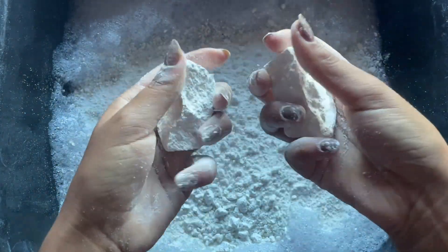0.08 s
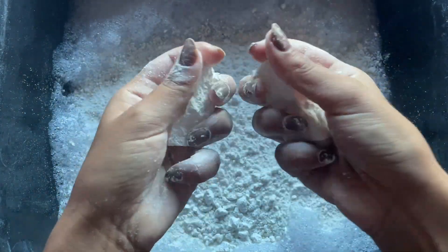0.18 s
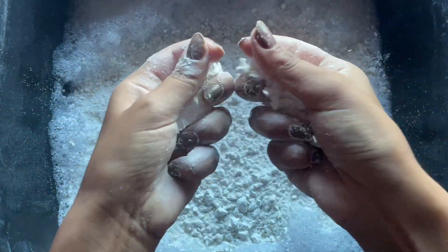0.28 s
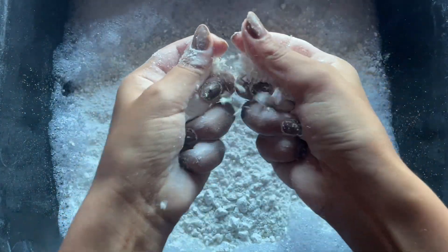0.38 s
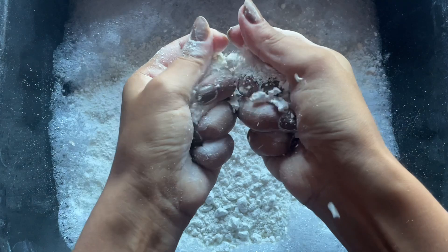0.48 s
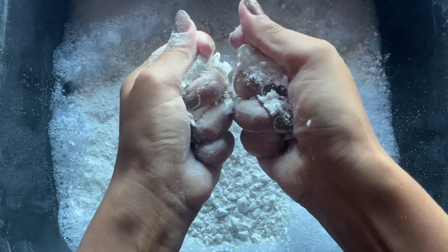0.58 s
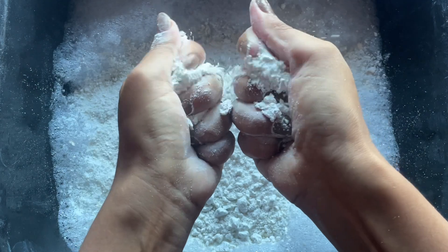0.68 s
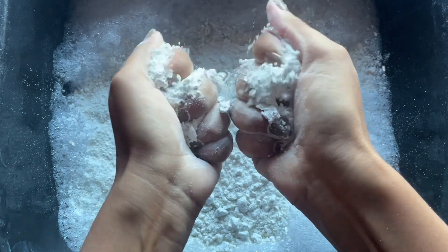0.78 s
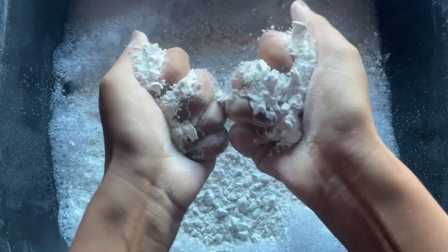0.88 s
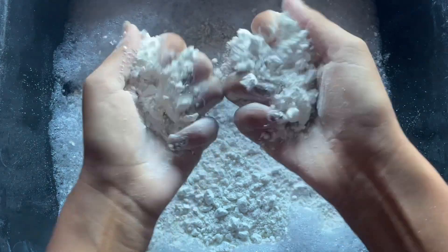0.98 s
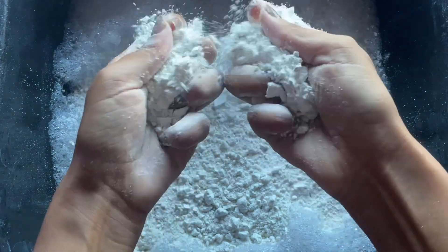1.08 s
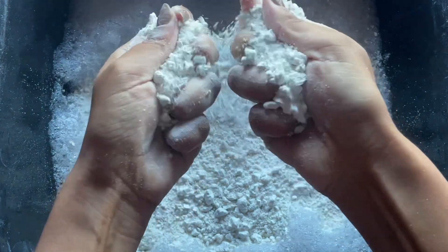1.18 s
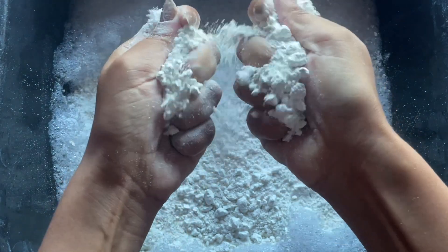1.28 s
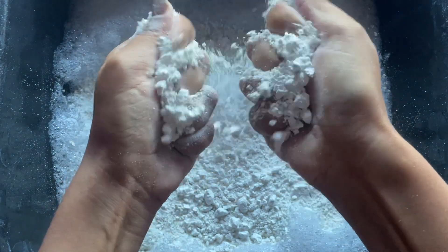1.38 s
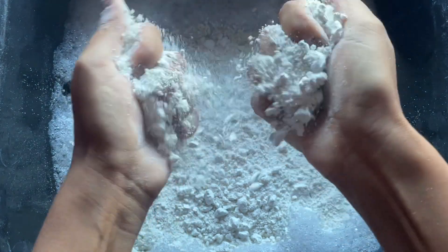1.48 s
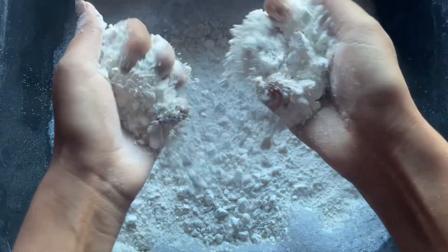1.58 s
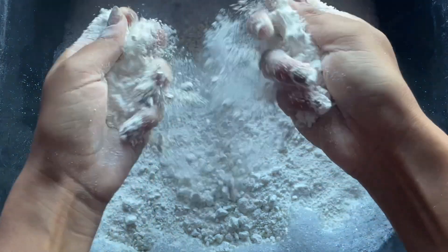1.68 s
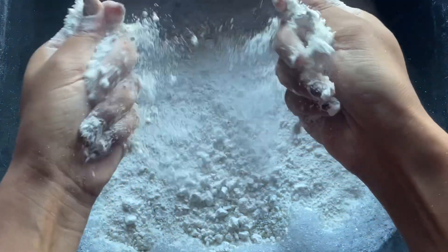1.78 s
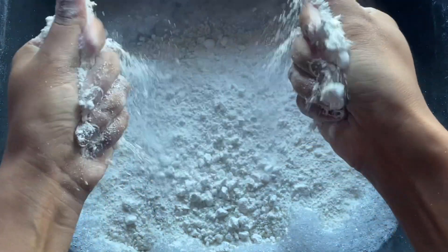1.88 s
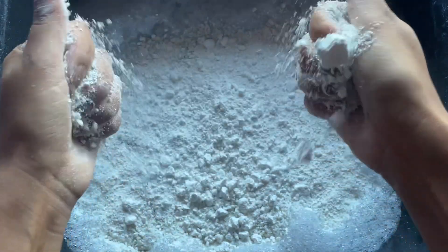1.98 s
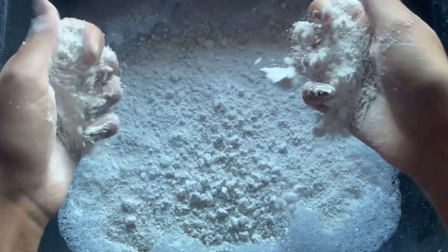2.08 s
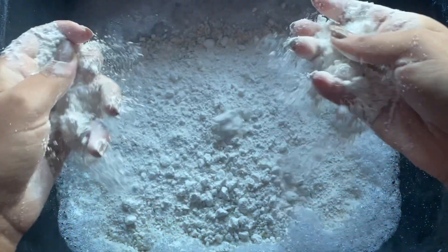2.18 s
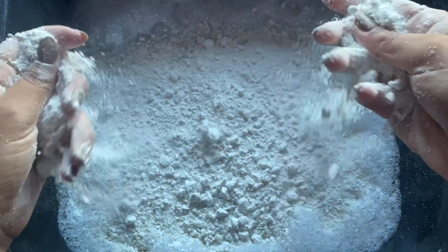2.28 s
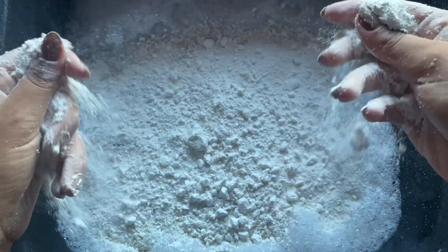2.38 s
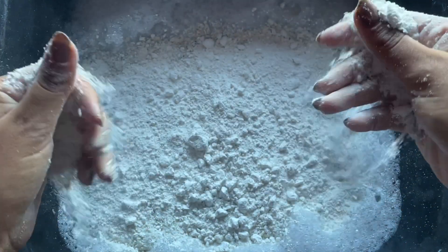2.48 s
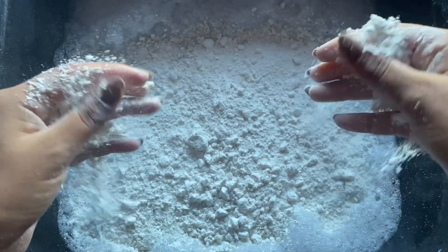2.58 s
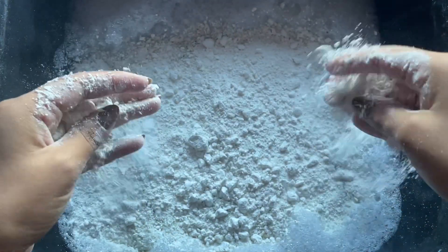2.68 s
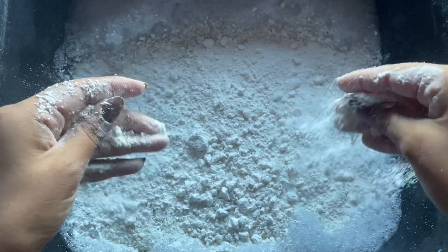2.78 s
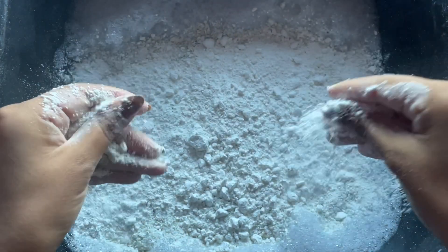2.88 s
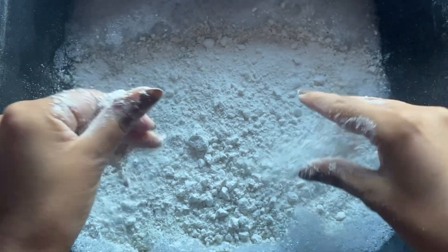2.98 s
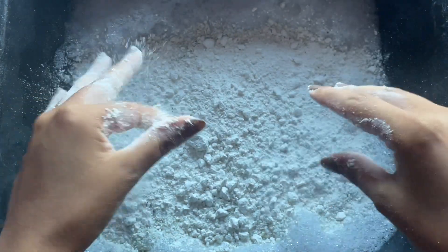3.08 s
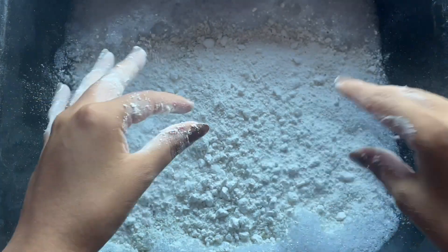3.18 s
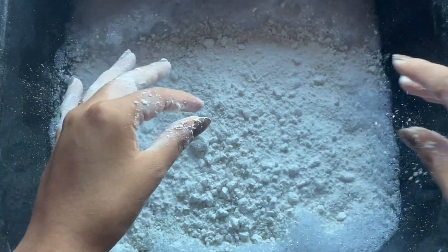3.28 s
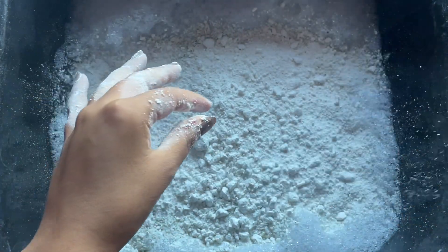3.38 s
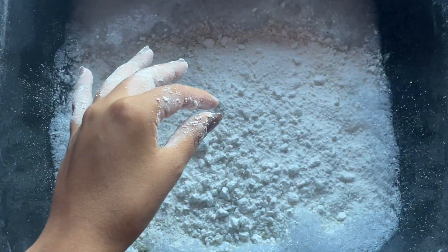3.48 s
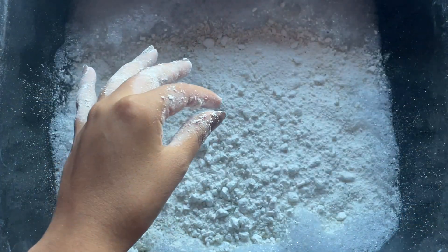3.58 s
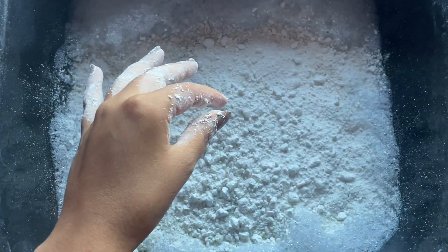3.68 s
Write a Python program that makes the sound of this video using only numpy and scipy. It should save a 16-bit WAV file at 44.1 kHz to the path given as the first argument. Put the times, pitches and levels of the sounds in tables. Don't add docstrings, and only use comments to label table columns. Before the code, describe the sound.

Dry snapping and crunching of powder clumps, then falling grains patter over soft low bumps.

```python
import sys
import numpy as np
from scipy import signal
from scipy.fft import rfft, irfft, next_fast_len
from scipy.io import wavfile
from scipy.ndimage import uniform_filter1d

SR = 44100
rng = np.random.default_rng(int(sys.argv[2]) if len(sys.argv) > 2 else 0)


def amplitude_ratio(level_db):
    exponent = np.asarray(level_db, float) / 20
    return 10 ** exponent


def put_to_file(sound):
    columns = np.atleast_2d(sound).T
    safe = np.clip(columns, -1, 1)
    whole_steps = np.round(safe * 32767)
    wavfile.write(sys.argv[1], SR, whole_steps.astype(np.int16))


N = 165375

# time in seconds, patter level in dB,
# tub drumming in dB relative to the patter, fine dust in dB relative to the patter.
POWDER_FLOW = [(0, -58.5, -11, -26), (.065, -58, -11, -19), (.11, -58, -11, -28), (.19, -58, -10, -28),
               (.3, -51.5, -4, -28), (.55, -54, -8, -28), (.95, -56, -8, -28), (1.19, -51.5, -3, -29),
               (1.36, -56, -3, -27), (1.45, -54.5, -4, -27), (1.6, -54.5, -5, -28), (1.8, -47.5, -7.5, -27),
               (1.97, -45.5, -8.5, -26.5), (2.03, -51, -7, -26), (2.19, -51.5, -10, -27),
               (2.26, -45.5, -5, -25), (2.39, -44, -8, -23), (2.53, -43, -9, -23.5), (2.59, -48, -9, -26),
               (2.66, -49, -7, -27), (2.78, -46.5, -12, -27), (2.9, -47, -15, -28), (3.02, -51, -10, -28),
               (3.21, -48, -9.5, -27.5), (3.33, -51.5, -11, -26.5), (3.47, -52, -17, -25.5),
               (3.54, -56, -12, -25), (3.69, -54, -17, -26), (3.75, -55, -12, -26)]
# start in seconds, peak in dB, tub ring in dB relative to the crack,
# centre of the crack in Hz.
CLUMP_CRACKS = [(0.0655, -40, -27, 3200), (0.1171, -43.5, -25, 2070), (0.1555, -43, -26, 1820),
                (0.2079, -20.5, -12.5, 990), (0.2206, -29, -12.5, 1910), (0.2343, -19.5, -13.5, 1600),
                (0.2582, -37, -9.5, 1310), (0.2795, -24.5, -16, 2530), (0.2965, -30, -12, 2370),
                (0.3157, -31.5, -18, 1420), (0.3214, -30, -15, 3020), (0.3979, -31, -30, 2500),
                (0.4151, -35, -23, 2330), (0.4876, -41, -29, 2010), (0.5448, -30, -12, 1000),
                (0.5842, -42, -4.5, 2650), (0.6805, -38.5, -10.5, 1380), (0.7269, -40.5, -12.5, 1970),
                (0.7752, -40.5, -20, 2240), (0.7993, -42, -23, 1740), (0.8325, -39, -23, 2020),
                (0.8984, -38, -27, 2220), (1.066, -42, -20, 2610), (1.0752, -36, -16.5, 2220),
                (1.1719, -33, -12, 902), (1.1818, -38, -12, 1810), (1.2094, -37, -20, 1600),
                (1.2571, -37.5, -10, 2820), (1.5195, -36, -13, 1590), (1.3866, -41, -16, 1800),
                (1.5972, -39, -16, 2020), (1.6605, -36, -20, 2720), (2.1943, -34, -17, 2530),
                (2.2387, -35, -19, 2300), (2.2706, -32, -22, 2090), (2.2929, -32, -24, 2140),
                (2.7041, -35, -22, 2300), (2.75, -34, -26, 2450), (3.1656, -35, -22, 2010),
                (3.3327, -34, -27, 1880), (3.3881, -36, -30, 2330), (3.435, -37, -30, 4200),
                (3.5278, -39, -27, 2220), (3.5602, -39, -27, 2100), (3.6525, -40, -30, 2480),
                (3.6724, -34, -36, 2500), (3.6974, -38, -30, 3500)]
# middle in seconds, peak in dB, pitch in Hz, length in seconds.
STAND_BUMPS = [(0.305, -41.5, 70.4, 0.038), (0.367, -49, 80, 0.032), (0.439, -47, 50, .03),
               (0.626, -40, 64, 0.037), (.9, -50, 60, .02), (0.968, -49, 70, .025), (1.031, -36, 62, .022),
               (1.047, -35, 60, .022), (1.148, -41, 55, 0.027), (1.196, -34, 54.7, .03),
               (1.238, -41, 60, .03), (1.321, -44.5, 65, 0.027), (1.363, -42, 54.7, .025),
               (1.541, -42.5, 63, 0.03), (1.729, -47, 75, .03), (1.856, -39.5, 54.7, .04),
               (1.998, -41, 60, 0.05), (2.099, -48, 55, 0.027), (2.191, -49, 55, .03), (2.46, -46, 60, .03),
               (2.56, -46, 55, .03), (2.753, -41.5, 69, 0.035), (3.152, -44, 65, .025),
               (3.203, -29.5, 62.4, 0.029), (3.247, -39.5, 55, .025), (3.304, -33.5, 52, 0.028),
               (3.373, -34.5, 52, 0.025), (3.438, -44.5, 68, 0.041)]
# middle in seconds, peak in dB, pitch in Hz, length in seconds.
LUMP_THUDS = [(.26, -46, 330, .03), (.3, -46, 150, .06), (.586, -48, 380, .012), (.635, -52, 350, .03),
              (.69, -52, 300, .02), (1.27, -51, 520, .025), (1.42, -54, 410, .025), (1.64, -52, 395, .05),
              (1.9, -52, 400, .07), (2.53, -50, 570, .03), (2.6, -52, 140, .05), (2.71, -54, 430, .03),
              (2.84, -51, 435, .03), (2.99, -54, 550, .04), (3.06, -52, 575, .025), (3.16, -51, 440, .018),
              (3.26, -52, 140, .06)]
# pitch in Hz, level in dB, time to fade by 60 dB in seconds.
TUB_NOTES = [(390.4, -1, 0.044), (300, -7, 0.055), (540, -4.5, 0.033), (740, 1, .016), (1000, 1.5, .012)]

# frequency in Hz, level in dB.
GRAIN_TONE = [(300, -18.5), (800, -8), (1500, -3.5), (2300, -1.5), (3600, -5.5), (5500, -12.5), (7500, -23),
              (11000, -68)]
# frequency in Hz, level in dB.
DUST_TONE = [(3000, -43), (6500, 2), (8500, 15), (10500, -.5), (12000, -18), (13200, -21), (14500, -45)]
# frequency in Hz, level in dB.
DRUM_TONE = [(120, -13), (220, -8), (300, -2), (400, 0), (560, -2), (800, -8), (1500, -30)]
# frequency in Hz, level in dB.
HOLLOW_TONE = [(900, -26), (1600, -11), (1840, -4), (2000, -8), (2230, 1), (2520, -6), (2750, -1),
               (3700, -14), (7000, -40)]
# frequency in Hz, level in dB.
ROOM_TONE = [(60, -2), (300, -1), (600, 0), (1400, -2), (1780, 4.5), (2100, -0.5), (3400, -10), (5000, -30)]
# frequency in Hz, level in dB per Hz.
RUMBLE_TONE = [(20, -25), (35, -11), (55, -3.5), (72, -2.5), (95, -10), (150, -12.5), (250, -23.5),
               (500, -65.5)]
# frequency in Hz, level in dB.
WALL_TONE = [(200, -1), (2000, -2), (3500, -15), (7000, -43)]
# frequency in Hz, lead in radians.
LEFT_LEAD = [(20, 0), (4200, 0), (5200, -.2), (6200, -.5), (6900, -.9), (7600, -2.1), (8250, -np.pi),
             (9000, -4.1), (10000, -5.2), (10900, -2 * np.pi), (12200, -2 * np.pi), (13500, -7.5)]
# frequency in Hz, level in dB.
LEFT_EXTRA = [(250, -.7), (1000, .2), (2200, 1.7), (5000, .6), (7000, 0)]
# frequency in Hz, level in dB.
MIC_TREBLE = [(9000, 0), (11500, -3), (12300, -5), (13000, -11), (13600, -20), (14500, -28)]


def read(table, hz):
    table = np.array(table, float)
    return np.interp(np.log(hz + 1), np.log(table[:, 0] + 1), table[:, 1])


def colour(x, table):
    size = next_fast_len(N + 8192)
    log_gain = read(table, np.fft.rfftfreq(8192, 1 / SR)) * np.log(10) / 20
    ceps = irfft(log_gain)
    ceps[1:4096] *= 2
    ceps[4097:] = 0
    response = irfft(np.exp(rfft(ceps)))
    y = irfft(rfft(x, size) * rfft(response, size), size)[:N]
    return y / np.sqrt(np.mean(y ** 2))


def walk(rate):
    hold = int(SR / rate)
    steps = np.repeat(rng.standard_normal(N // hold + 1), hold)
    return 1.35 * uniform_filter1d(uniform_filter1d(steps, hold), hold)[:N]


def ticks(per_s, spread_db):
    draw = rng.random(N) * SR / per_s
    size = amplitude_ratio(-spread_db * np.log(np.minimum(draw, 1) + .02))
    x = np.where(draw < 1, size, 0.)
    x = x * np.sign(np.sin(draw * 999))
    return x / x.std()


def specks(per_s, spread_db, hiss):
    hiss = np.clip(hiss, 0, 1)
    return np.sqrt(1 - hiss) * ticks(per_s, spread_db) + np.sqrt(hiss) * rng.standard_normal(N)


def powder(t):
    rows = np.array(POWDER_FLOW).T
    level, tub_db, dust_db = (np.interp(t, rows[0], r) for r in rows[1:])
    flurry = amplitude_ratio(level + 1.2 + .3 * walk(16) + 1.1 * walk(110))

    fall = specks(per_s=3000, spread_db=3.5, hiss=.49)
    dust = amplitude_ratio(dust_db + .6 * walk(25)) * colour(fall, DUST_TONE)
    grains = colour(fall, GRAIN_TONE) + dust

    hollow_db = -5.5 + .6 * (level + 45)
    hollow = amplitude_ratio(hollow_db) * colour(specks(900, 3., .3), HOLLOW_TONE)
    drum = amplitude_ratio(tub_db + 1.8 * walk(22)) * colour(specks(700, 2.7, .52), DRUM_TONE)
    room = amplitude_ratio(-9.5 + .7 * walk(10)) * colour(specks(2000, 2.4, .62), ROOM_TONE)
    mic_hiss = amplitude_ratio(-84) * colour(rng.standard_normal(N), DUST_TONE)
    return flurry * (grains + hollow + drum) + mic_hiss, flurry * room


def rumble():
    return amplitude_ratio(-57 + 2.8 * walk(14)) * colour(rng.standard_normal(N), RUMBLE_TONE)


def tub_ring(t):
    ring = 0
    for db, hz, t60 in ((db, hz, t60) for hz, db, t60 in TUB_NOTES):
        onset = 1 - np.exp(-t / .0004)
        ring = ring + amplitude_ratio(db) * np.sin(2 * np.pi * hz * t) * onset * 1000 ** (-t / t60)
    return np.roll(ring * (t < .09), 70)


def cracks():
    size = 4096
    out, t = np.zeros(N + size), np.arange(size) / SR
    ring = tub_ring(t)
    f = np.fft.rfftfreq(size, 1 / SR)
    grain_tone = amplitude_ratio(np.maximum(read(GRAIN_TONE, f), -48) * .72)
    bright_peak = .6 / (1 + ((f - 3800) / 500.) ** 2)
    for s, db, tub_db, hz in CLUMP_CRACKS:
        softness = np.abs(db + 21)
        width = .0006 + .0001 * softness
        crumbs = amplitude_ratio(-12) * (1 - np.exp(-t / width)) * np.exp(-t / .009)
        snap = np.exp(-(t / width - 1.2) ** 2) + crumbs
        clump_peak = 1 / (1 + ((f - hz) / 500.) ** 2)
        tone = grain_tone * (.4 + clump_peak + bright_peak)
        burst = snap * irfft(rfft(rng.standard_normal(size)) * tone)
        burst = burst / np.abs(burst).max()
        level = amplitude_ratio(db + .6 - .25 * softness)
        i = int(s * SR)
        out[i:i + size] += level * (burst + amplitude_ratio(tub_db + 6) * ring)
    return out[:N]


def thuds(t):
    out, rise_per_s, wobble_depth = 0, .6, .11
    wobble = np.cumsum(walk(130)) / SR
    waver = amplitude_ratio(-3 + 3.5 * walk(90))
    for s, db, hz, length in LUMP_THUDS:
        u = np.clip(t - s, -.25, .25)
        swell = np.exp(-(u / length) ** 2)
        turns = hz * (u + rise_per_s * u ** 2 / 2 + wobble_depth * wobble)
        out = out + amplitude_ratio(db) * swell * np.sin(2 * np.pi * turns)
    return out * waver


def bumps(t):
    out, sag_per_s = 0, 12
    for s, db, hz, length in STAND_BUMPS:
        u = np.clip(t - s, -.1, .1)
        swell = np.exp(-(u / (length * np.where(u < 0, .45, .65))) ** 2)
        out = out + amplitude_ratio(db) * swell * np.cos(2 * np.pi * hz * (u - sag_per_s * u ** 2 / 2))
    return out


def scene():
    t = np.arange(N) / SR
    near, room = powder(t)
    shake = rumble()
    snaps = cracks()
    middle = near + shake + snaps + thuds(t) + bumps(t)
    echo = amplitude_ratio(-14) * snaps.std() * colour(np.roll(snaps, 70), WALL_TONE)
    side_rumble = amplitude_ratio(-71) * colour(rng.standard_normal(N), RUMBLE_TONE)
    side = room + echo + side_rumble
    return middle + side * np.array([[1], [-1]])


def top_cut(x):
    return signal.sosfilt(signal.butter(12, 13640, fs=SR, output="sos"), x)


def record(dry):
    f = np.fft.rfftfreq(N, 1 / SR)
    lead = np.exp(.5j * read(LEFT_LEAD, f)) * amplitude_ratio(read(LEFT_EXTRA, f) / 2)
    ports = np.array([lead, 1 / lead]) * amplitude_ratio(read(MIC_TREBLE, f))
    mix = irfft(rfft(dry) * ports, N)
    return top_cut(mix)


dry = scene()
out = record(dry)
put_to_file(out)
```